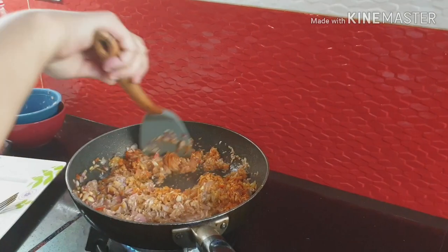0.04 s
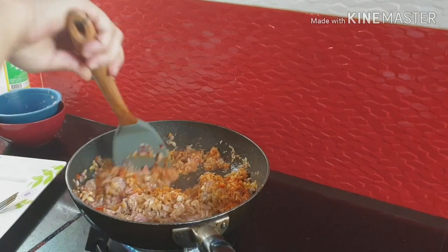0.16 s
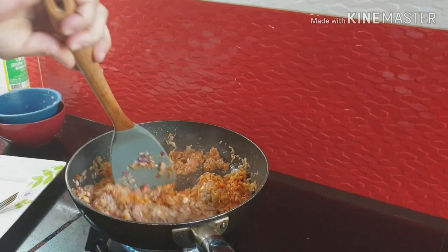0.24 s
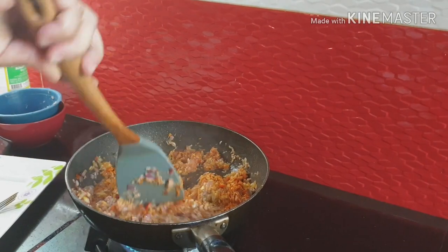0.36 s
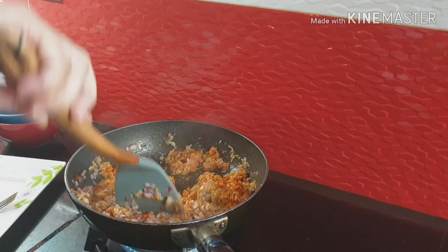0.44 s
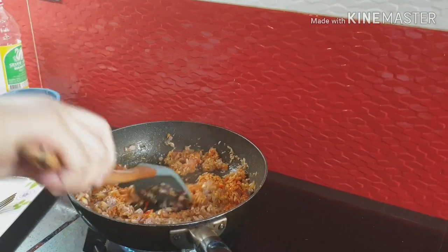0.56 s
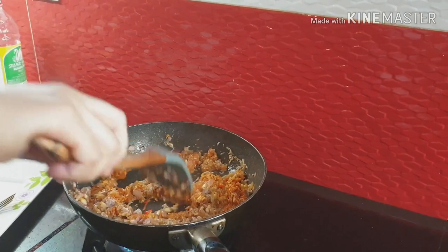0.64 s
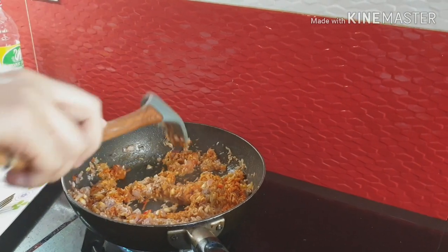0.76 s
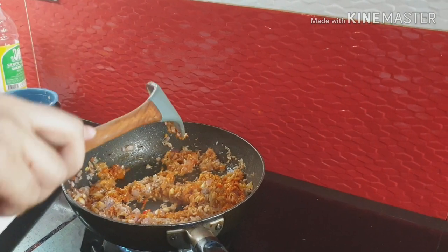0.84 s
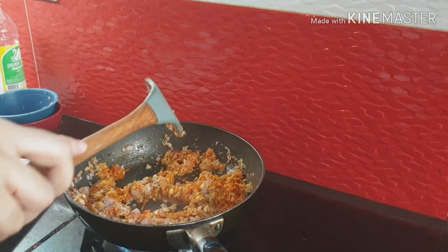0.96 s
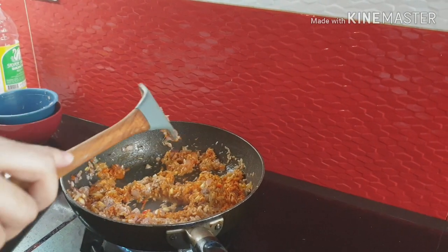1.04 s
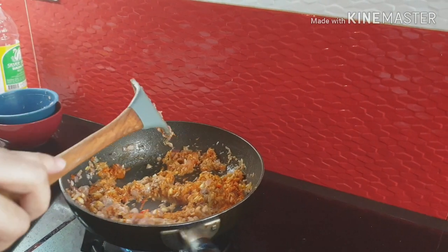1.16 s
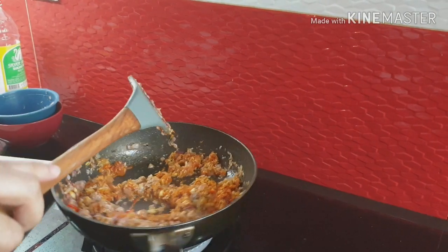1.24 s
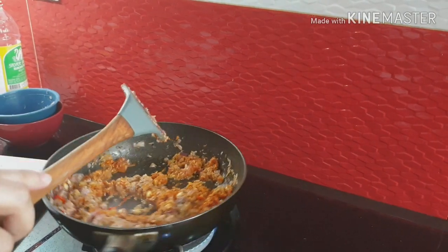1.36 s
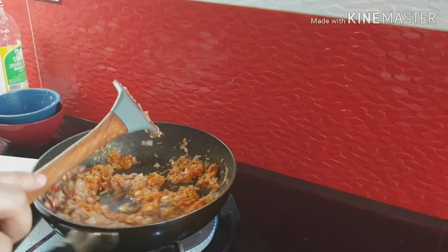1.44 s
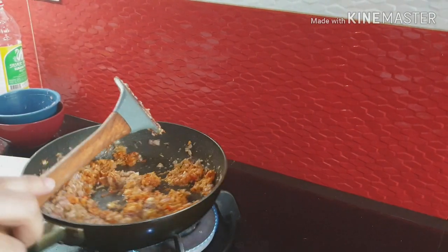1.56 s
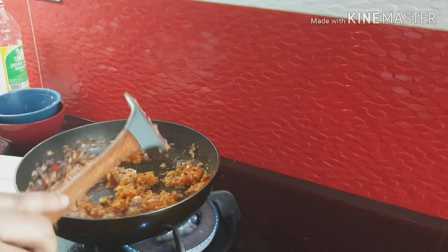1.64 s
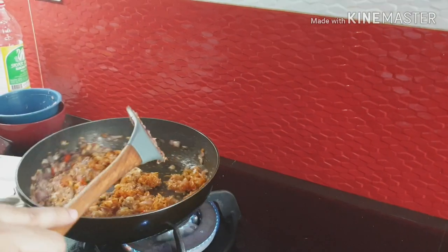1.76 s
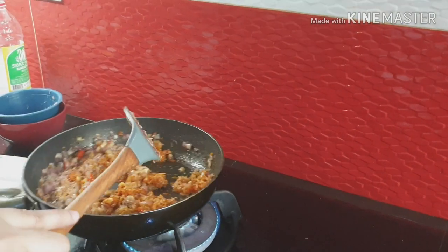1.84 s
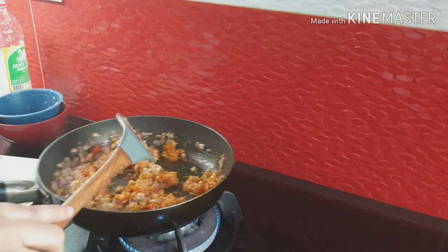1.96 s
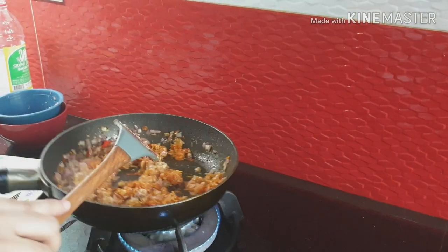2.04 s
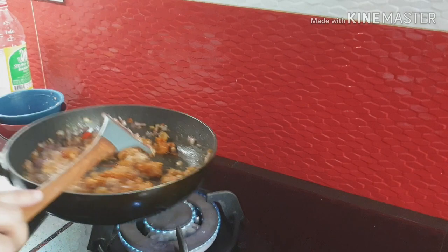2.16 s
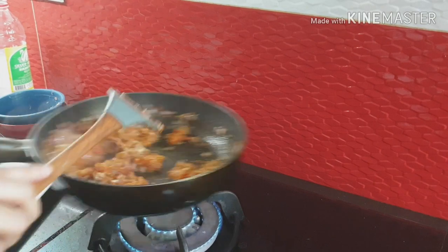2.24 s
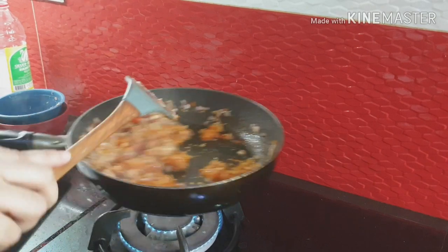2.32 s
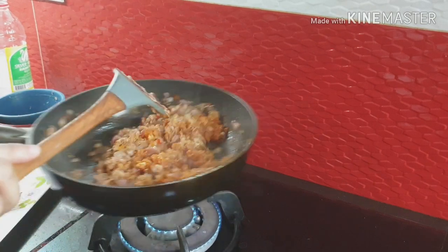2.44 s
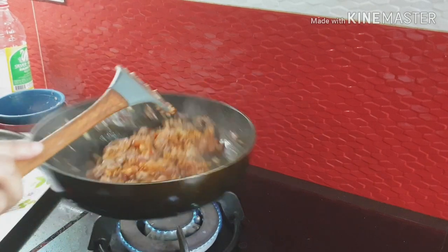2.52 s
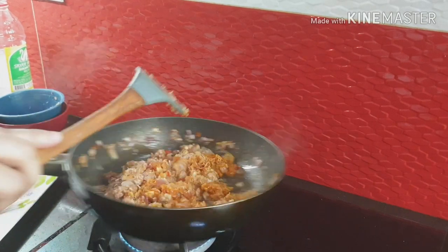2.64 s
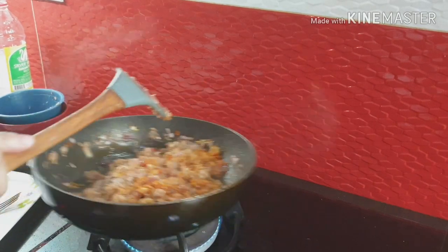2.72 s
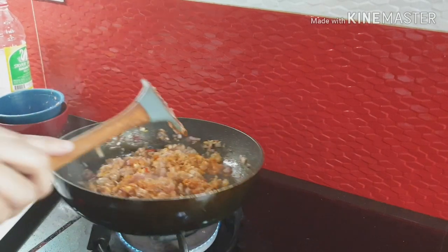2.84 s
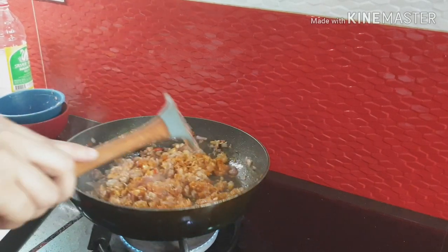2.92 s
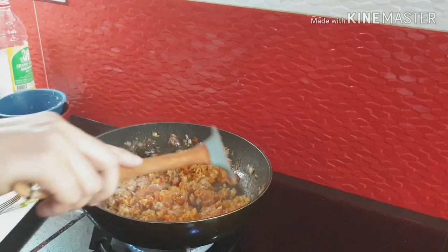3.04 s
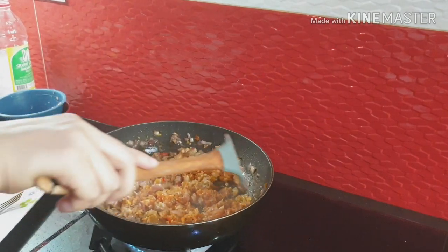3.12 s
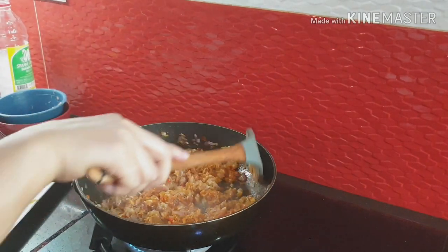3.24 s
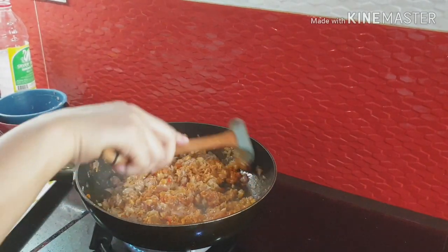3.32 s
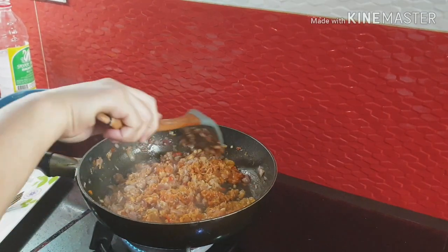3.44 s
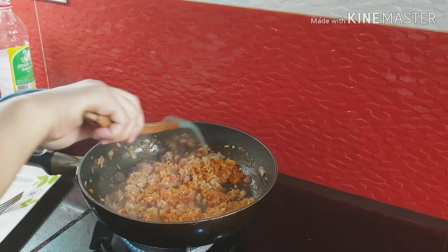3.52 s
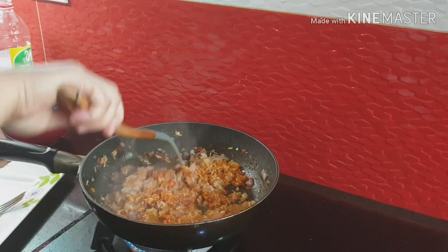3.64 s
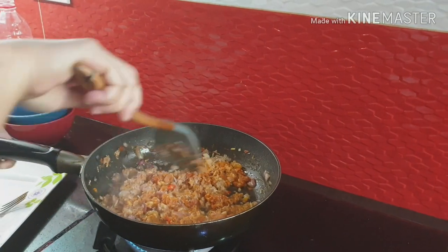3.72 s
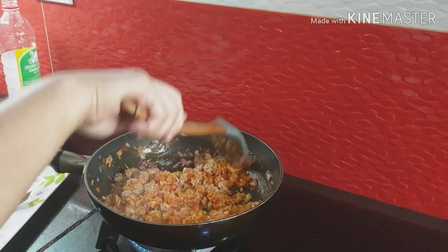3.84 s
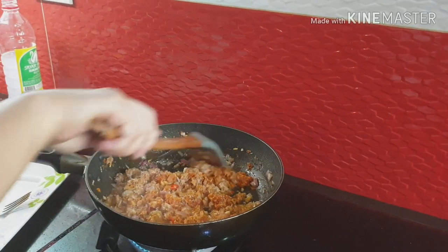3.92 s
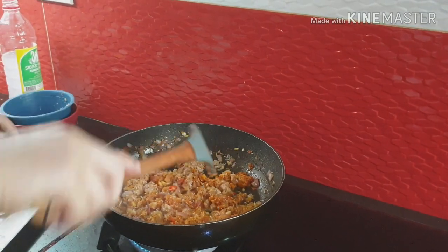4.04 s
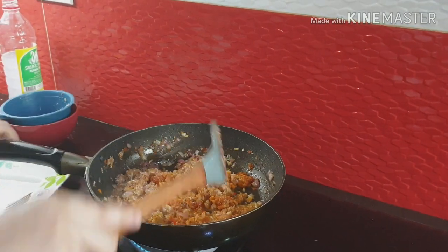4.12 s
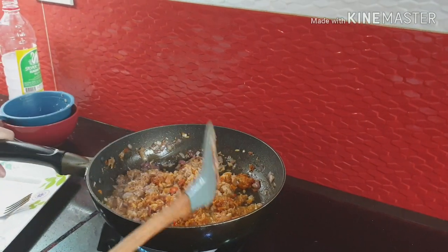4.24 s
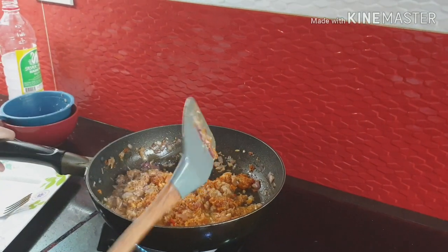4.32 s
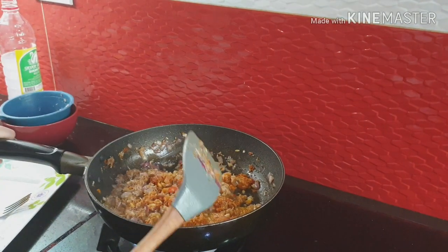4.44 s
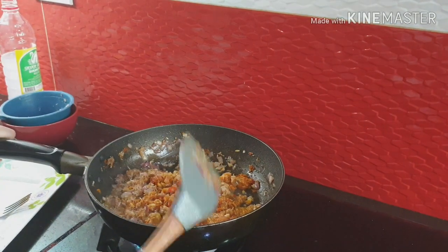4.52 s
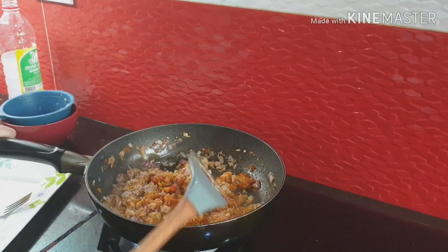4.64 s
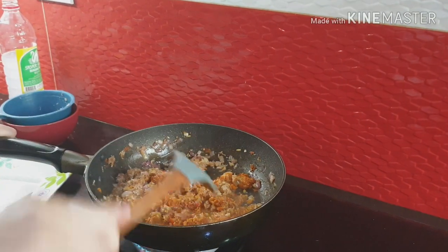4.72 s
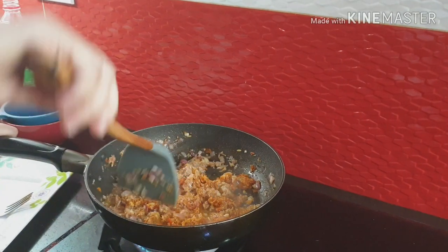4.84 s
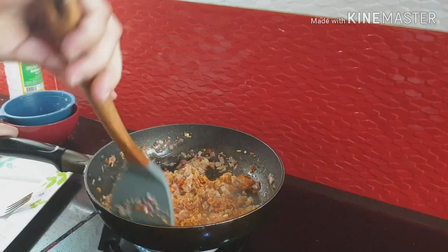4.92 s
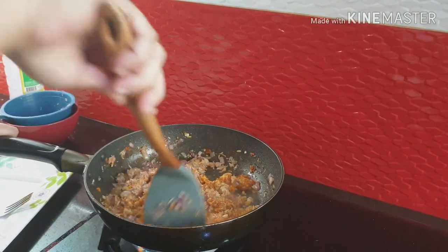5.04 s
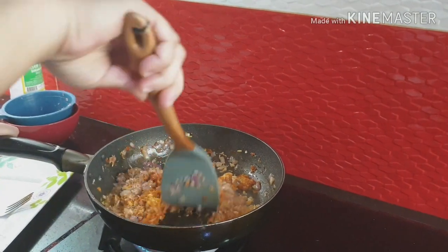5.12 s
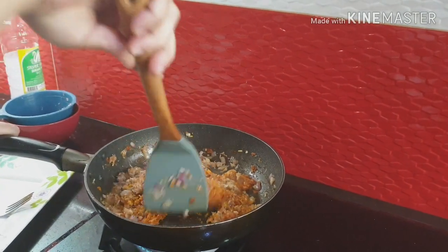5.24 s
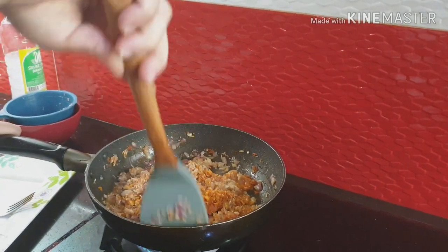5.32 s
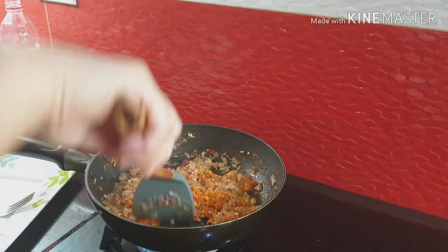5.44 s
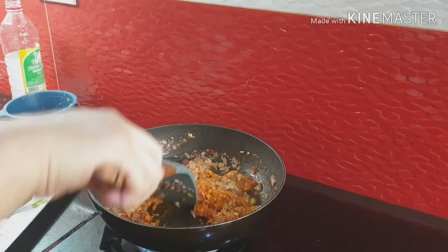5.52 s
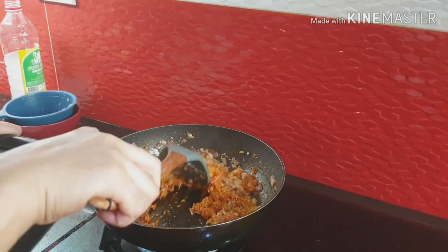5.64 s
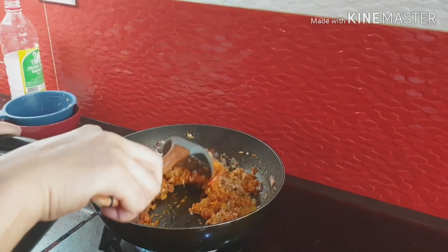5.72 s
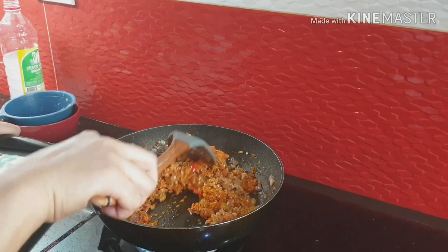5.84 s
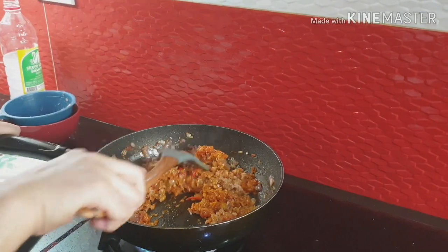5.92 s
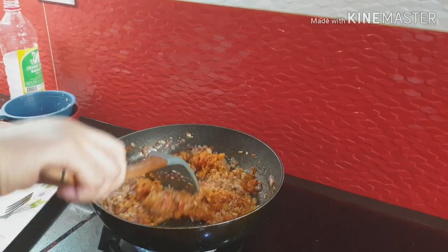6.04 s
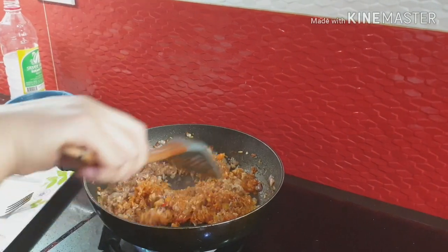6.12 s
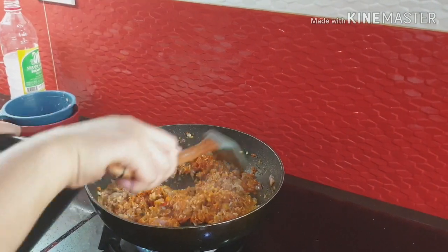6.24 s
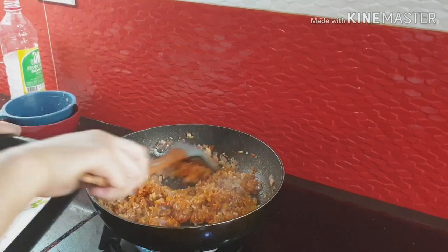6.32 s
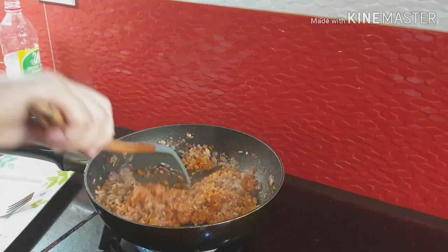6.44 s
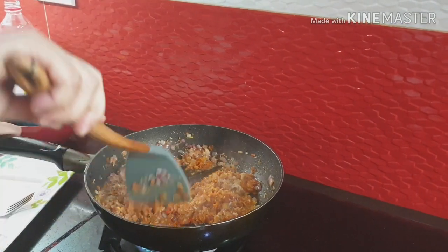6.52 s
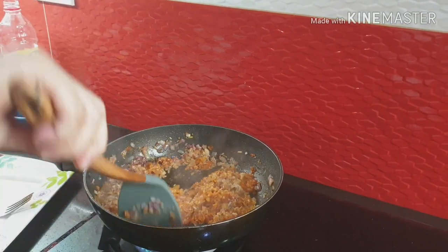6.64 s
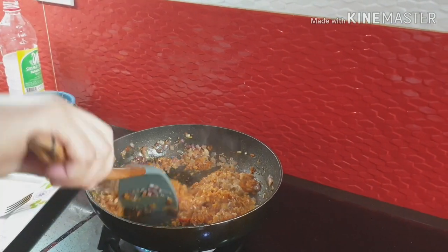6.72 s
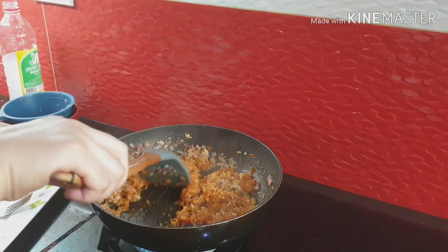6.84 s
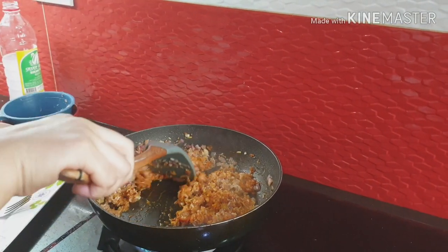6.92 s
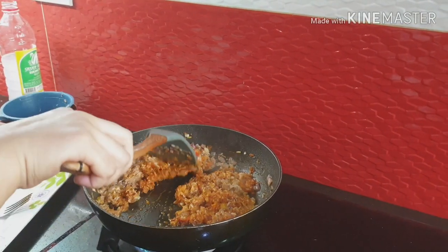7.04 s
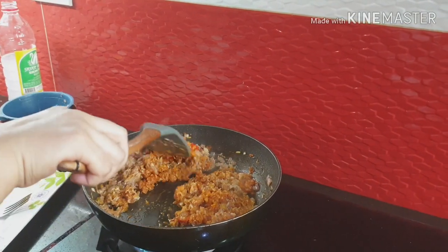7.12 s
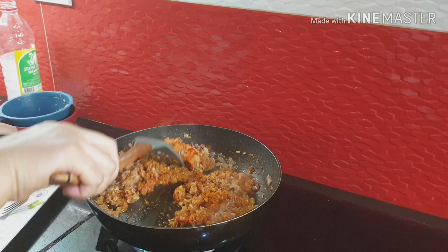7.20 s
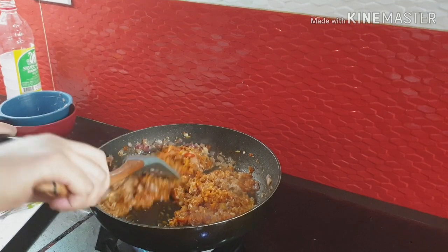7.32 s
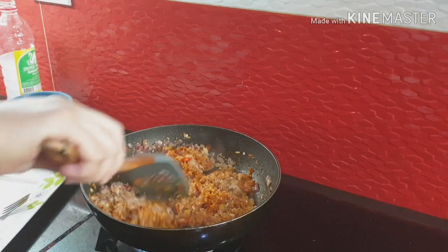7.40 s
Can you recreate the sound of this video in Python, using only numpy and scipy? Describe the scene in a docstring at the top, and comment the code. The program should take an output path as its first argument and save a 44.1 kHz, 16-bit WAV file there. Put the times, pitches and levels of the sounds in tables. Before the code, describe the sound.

A spatula taps a frying pan over faint sizzling, the pan scrapes and clatters across an iron grate, then clanks down and settles.

```python
"""A small kitchen, two microphone channels: the pan and gas stove on the right, only a faint hiss on the left.
Noise and tiny clicks make the flame and the sizzling paste throughout; a spatula taps the nonstick pan, then pushes.
The pan is dragged over the iron grate in shoves of stick-slip grains, amid knocks; tossed paste lands in steam.
It is set down with a clank, wobbles to rest and lands a few more times; one late tap and more soft pushes follow.
Each blow is a click that excites noisy bands, the ringing modes of the pan and the stove top."""
import sys
import numpy as np
from scipy import signal
from scipy.fft import rfft, irfft, next_fast_len
from scipy.io import wavfile

SR = 44100
rng = np.random.default_rng(int(sys.argv[2]) if len(sys.argv) > 2 else 0)


def digitize_waveform(pressure):
    """Quantize a signal to 16-bit integers and store it at the path in sys.argv[1].

    Rows of a 2-D input are taken as channels; values are limited to [-1, 1].
    """
    field = np.atleast_2d(pressure).T
    bounded = np.clip(field, -1, 1)
    quanta = np.round(bounded * 32767).astype(np.int16)
    wavfile.write(sys.argv[1], SR, quanta)


N = 329427
TIME = np.arange(N) / SR
# All source levels are in dB before the gains of the mix.


def from_db(db):
    """Decibels to gain."""
    return 10 ** (np.asarray(db) / 20)


def rms_one(x):
    """Scale to unit rms."""
    return x / np.sqrt(np.mean(x ** 2) + 1e-20)


def in_time(rows):
    """Each column of a curve at every sample."""
    s, *columns = np.transpose(rows)
    return [np.interp(TIME, s, c) for c in columns]


def at_hz(points, hz):
    """Read a table on a log-frequency axis."""
    f, value = np.transpose(points)
    return np.interp(np.log(hz), np.log(f), value)


def drift(rate):
    """Random wander of rms 1: `rate` new points a second, joined by straight lines."""
    points = rng.standard_normal(N // 20)
    return rms_one(np.interp(TIME * rate, np.arange(N // 20), points))


def high_pass(x, hz):
    """Remove what lies below a frequency."""
    return signal.sosfilt(signal.butter(2, hz, "high", fs=SR, output="sos"), x)


def colour(x, spectrum):
    """Give a steady signal a spectrum; rms 1."""
    size = next_fast_len(N)
    hz = np.maximum(np.arange(size // 2 + 1) * SR / size, 1)
    gain = from_db(at_hz(spectrum, hz)) * (hz > 20)
    return rms_one(irfft(rfft(x, size) * gain, size)[:N])


def clicks(times, sizes):
    """One impulse at each time."""
    out = np.zeros(N)
    out[np.round(times * SR).astype(int)] = sizes
    return out


def ring(x, hz, t60):
    """A damped resonance: a unit click sets a sine of height 1 ringing, down 60 dB after t60 seconds."""
    r, w = from_db(-60 / (t60 * SR)), 2 * np.pi * hz / SR
    return signal.lfilter([0, np.sin(w)], [1, -2 * r * np.cos(w), r * r], x + 1e-18)


def fade(power, t60):
    """Energy dies away by 60 dB in t60 seconds."""
    return signal.lfilter([1], [1, -10 ** (-6 / (t60 * SR))], power + 1e-24)


def grains(per_s, spread_db):
    """Random tiny clicks of uneven size; rms 1."""
    unevenness = np.minimum(rng.exponential(1, N), 4)
    sizes = from_db(spread_db * unevenness) * rng.standard_normal(N)
    return rms_one(sizes * (rng.random(N) < per_s / SR))


# Hard surfaces close to the pan, 0.6 to 2.5 m of extra path. Each row: delay in seconds, share reflected.
SURFACES = [(.0017,0.066),(.0029,0.18),(.0047,.35),(.0073,0.063)]


def reflect(x, above_hz):
    """Pan wall, stove top and backsplash throw back the short waves and comb the treble."""
    short = high_pass(x, above_hz)
    return x + sum(share * np.pad(short, (int(delay * SR), 0))[:N] for delay, share in SURFACES)


# Vigour of the frying, which flares with the toss and sinks until the stirring resumes.
# Each row: time in seconds, level of the sizzle in dB, level of the wet fizz in dB.
FRYING_VIGOUR = [(0,-54.5,-54),(1.8,-55.5,-51.5),(2.4,-54,-55),(3.5,-60,-58),(4.4,-59.5,-59),(6.1,-57.5,-58),(7.47,-53.5,-53)]
# Spectrum of the left channel's hiss. Each row: frequency in Hz, relative density in dB per Hz.
HISS_SPECTRUM = [(30, -6), (100, 0.5), (250, -4), (1000, 0), (2500, -5.5), (4500, -14), (6000, -21.5),
                 (8300, -33), (10500, -17), (13000, -16.5), (15500, -22)]


def left_hiss():
    """Faint noise in the left channel follows most of the sizzle's swing in dB."""
    sizzle_db, _ = in_time(FRYING_VIGOUR)
    level_db = -68.5 + 0.85 * (sizzle_db - sizzle_db.mean())
    return from_db(level_db) * colour(rng.standard_normal(N), HISS_SPECTRUM)


# Spectrum of the burner. Each row: frequency in Hz, relative density in dB per Hz.
FLAME_SPECTRUM = [(25, -13), (45, 1.5), (60, 3.5), (80, -3), (115, 0), (150, -10.5), (200, -14.5),
                  (270, -10), (340, -9.5), (430, -31), (1000, -36), (3000, -37)]


def flame():
    """The burner rumbles softly: low noise of slightly wandering level."""
    return from_db(-56 + 0.62 * drift(3.8)) * colour(rng.standard_normal(N), FLAME_SPECTRUM)


# Spectra of the tiny bubbles and the wet paste. Each row: frequency in Hz, relative density in dB per Hz.
SIZZLE_SPECTRUM = [(3000, -8), (6000, -3.5), (7800, -5.5), (9000, 1.5), (11400, 5.5), (13000, 0),
                   (15500, -10)]
FIZZ_SPECTRUM = [(80, -25), (200, -6.5), (500, 2.5), (800, 3.5), (1300, 1), (4800, 0), (7500, -6),
                 (15000, -10)]


def frying():
    """Countless tiny steam bubbles merge to a sizzle, over a lower fizz from the wet paste; a few pop alone."""
    sizzle_db, fizz_db = in_time(FRYING_VIGOUR)
    pops = .12 * grains(per_s=200, spread_db=2.5)
    bubbles = colour(rng.standard_normal(N) + pops, SIZZLE_SPECTRUM)
    wet_paste = colour(reflect(rng.standard_normal(N), above_hz=5400), FIZZ_SPECTRUM)
    sizzle = bubbles * from_db(sizzle_db + .5 * drift(25))
    fizz = wet_paste * from_db(fizz_db + 0.91 * drift(17))
    return sizzle + fizz


# Tossed paste lands on hot oil. Each row: time in seconds, level in dB.
SPLATS = [(2.5,-46),(2.535,-44),(2.562,-46),(2.585,-51)]


def splats():
    """Each lump that lands flashes a little water to steam: a short burst of treble noise."""
    s, level = np.transpose(SPLATS)
    flash = np.sqrt(fade(clicks(s, from_db(level)) ** 2, t60=.05))
    steam = [(3000, -18), (10000, -8), (14500, 0), (16000, -2), (18000, -30)]   # Hz, dB
    return flash * colour(rng.standard_normal(N), steam)


def strike(s, level_db, thud_db, clank_db, crack_db, clank_hz, ring_hz, lift_db, rock_db):
    """One contact: its time and level, its lows, mids and highs, the ring it favours, and how it rocks the stove."""
    return s, level_db, thud_db, clank_db, crack_db, clank_hz, ring_hz, lift_db, rock_db


def simple_blow(s, level, thud, hardness, ring_hz, lift_db, clank_hz, rock_db):
    """A simple contact: its hardness in dB is its crack, and a share of it adds to the clank."""
    clank = 5 + 0.54 * hardness
    return strike(s, level, thud, clank, hardness, clank_hz, ring_hz, lift_db, rock_db)


def contact_level(blow, hz, spot_share=1):
    """Level in dB at a frequency: weight gives lows, hardness highs, the spot touched favours some modes."""
    _, level, thud, clank, crack, clank_hz, favoured_hz, lift_db, _ = blow
    tilt = [(130, thud), (260, 0.0052), (900, 0), (2200, clank - 3), (5600, clank - 3), (8000, crack)]
    hump = 6 * np.exp(-(np.log2(hz / clank_hz) / 0.18) ** 2)
    spot = spot_share * lift_db * np.exp(-(np.log2(hz / favoured_hz) / 0.14) ** 2)
    return level + at_hz(tilt, hz) + hump + spot


# Dense clatter of pan and grate. Each row: frequency in Hz, relative density in dB per Hz.
CLATTER_SPECTRUM = [(35, -23), (60, 1), (130, -3), (165, 0), (205, -7.5), (280, 6.5), (360, -0.5),
                    (440, -4), (650, -2.5), (1050, -6.5), (2200, -11), (3300, -14.5), (4400, -14.5),
                    (7600, -21), (11200, -21), (15500, -35)]
# Reverberation of the small kitchen. Each row: frequency in Hz, t60 in seconds.
KITCHEN_DECAY = [(60, 0.75), (250, 0.48), (600, 0.53), (2500, 0.56), (5000, 0.42), (11000, 0.52),
                 (16000, 0.15)]
EDGES = np.geomspace(25, 16500, 29)   # band edges in Hz
CENTRES = np.sqrt(EDGES[1:] * EDGES[:-1])


def clatter(blows, body_t60, damping, room_db, snap):
    """A blow snaps, then excites a thicket of short modes (t60 given at 1 kHz), which lingers in the room."""
    s = np.array(blows)[:, 0]
    white, out = rng.standard_normal((2, N)), np.zeros(N)
    for k, hz in enumerate(CENTRES):
        level = np.array([contact_level(blow, hz, spot_share=0.38) for blow in blows])
        force = clicks(s, from_db(at_hz(CLATTER_SPECTRUM, hz) + level))
        body = fade(force ** 2, body_t60 * (hz / 1000) ** -damping)   # high modes die first
        room = fade((force * from_db(room_db)) ** 2, at_hz(KITCHEN_DECAY, hz))
        band = signal.butter(2, EDGES[k:k + 2], "band", fs=SR, output="sos")
        # neighbouring bands meet in opposite phase, so the snap alternates in sign
        snapping = (-1) ** k * snap * force
        lingering = white[k % 2] * np.sqrt(body + room)
        out += signal.sosfilt(band, snapping + lingering)
    return out


# Bending modes of the pan. Each row: frequency in Hz, level in dB, t60 in seconds when left undamped.
PAN_MODES = [(263,-3.5,0.13),(282,-38,0.068),(339,-7.5,0.4),(508,-10,0.25),(566,-8.5,0.36),(659,-10.5,0.36),(713,-10.5,0.22),(770,-14,0.42),(887,-12,0.14),(948,-21.5,.25),(1355,-19,0.43),(1790,-21,0.24),(1960,-45,0.12),(2040,-13.5,0.25),(2280,-26,0.61),(2934,-10.5,0.17),(4280,-15,0.091),(5130,-38,.25),(5200,-21,0.21),(9360,-19,0.16),(10700,-15,.12)]


def pan_ring(blows, sustain):
    """Every blow rings all pan modes, each with a strength of its own; whatever rests on the pan damps them."""
    s = np.array(blows)[:, 0]
    out = np.zeros(N)
    for k, (hz, mode_db, t60) in enumerate(PAN_MODES):
        level = np.array([contact_level(blow, hz) for blow in blows]) + rng.standard_normal(len(s))
        out += (-1) ** k * ring(clicks(s, from_db(level + mode_db)), hz, t60 * sustain)
    return out


def pan_sing(pushes):
    """The pan's modes under a steady stream of tiny pushes; rms 1."""
    modes = enumerate(PAN_MODES)
    return rms_one(sum((-1) ** k * from_db(db) * ring(pushes, hz, t60) for k, (hz, db, t60) in modes))


# Modes of the stove top. Each row: frequency in Hz, level in dB, t60 in seconds.
STOVE_MODES = [(102.3, -14, 0.57), (120.6, -4, 0.24)]


def stove_thud(blows):
    """A blow's weight passes through the grate, shakes the stove top and rocks the stove on its feet."""
    s, level, thud, *_, rocking = np.transpose(blows)
    force = clicks(s, from_db(level + thud))
    top = sum(from_db(mode_db) * ring(force, hz, t60) for hz, mode_db, t60 in STOVE_MODES)
    feet = ring(clicks(s, from_db(level + rocking)), hz=55.9, t60=0.39)
    return high_pass(top + feet, 42)


# High resonances of rim and grate under the scraping.
# Each row: frequency in Hz, bandwidth in Hz, relative level in dB.
RIM_BANDS = [(4400, 210, -3), (4940, 40, -2), (9180, 99, -5), (10700, 68, -5), (11500, 73, -3),
             (13500, 38, -7)]


def rim_sing(slips):
    """Narrow metallic bands that come and go as the point of contact travels; rms 1."""
    out = np.zeros(N)
    for hz, width, db in RIM_BANDS:
        t60 = np.log(1000) / (np.pi * width)
        out += from_db(db + 5.5 * drift(16.1)) * rms_one(ring(slips, hz, t60))
    return rms_one(out)


def shove(start, length, attack_s):
    """A shove builds up, slackens as the pan travels, and stops."""
    age = np.maximum(TIME - start, 0)
    sag_db = 24.5 * age   # rates in dB per second
    release_db = 258 * np.maximum(age - length, 0)
    return np.minimum(age / attack_s, 1) ** 2 * from_db(-sag_db - release_db)


# Shoves of the pan over the grate.
# Each row: start in seconds, length in seconds, level of the rasp in dB, level of the judder in dB.
SHOVES = [(1.175,0.24,-40,-36.5),(1.353,0.29,-37,-43),(1.798,0.29,-42,-53)]


def slide():
    """The base sticks and slips on the rough iron; the slips ring in the pan and make the stove judder."""
    rasping = sum(from_db(db) * shove(s, length, attack_s=0.071) for s, length, db, _ in SHOVES)
    juddering = sum(from_db(db) * shove(s, length, attack_s=0.021) for s, length, _, db in SHOVES)
    slips = grains(per_s=3000, spread_db=1.5) * from_db(2.0 * drift(110))
    rasp_spectrum = [(hz, db + 0.21 * np.log2(hz / 1000)) for hz, db in CLATTER_SPECTRUM]
    rasp = colour(reflect(slips, above_hz=1160), rasp_spectrum)
    judder = colour(slips, [(30, -20), (55, 14.0), (80, -15), (130, -2.5), (200, -14), (800, -75)])
    scrape = rasp + from_db(-7.0) * pan_sing(slips) + from_db(-9) * rim_sing(slips)
    return rasping * scrape + juddering * judder


# Spatula taps. Each row: time in seconds, level in dB, hardness in dB, favoured ring in Hz, its lift in dB.
TAPS = [(.109,-51.5,11,900,7),(0.285,-47,-15,340,1),(.511,-41.5,-12,340,3),(.561,-48,1,5200,14),(.644,-30.5,-9.5,530,10),(5.392,-54.5,6,331.3,24)]
# Soft pushes of the blade through the paste, one early and the others late.
# Each row: time in seconds, level in dB, stove rocking in dB.
PUSHES = [(.935,-63.5,13),(5.105,-61.5,19),(5.47,-62.5,20),(6.665,-58,2)]


def spatula_blows():
    """Light taps ring the pan; pushes are dull and heavy."""
    clank_hz = 4280
    taps = [simple_blow(s, level, -5.5, hardness, ring_hz, lift_db, clank_hz, rock_db=-9)
            for s, level, hardness, ring_hz, lift_db in TAPS]
    pushes = [simple_blow(s, level, thud=17, hardness=-9, ring_hz=320, lift_db=6, clank_hz=clank_hz,
                          rock_db=rock_db)
              for s, level, rock_db in PUSHES]
    return taps + pushes


def spatula():
    """The soft blade meets the pan through the paste, which shortens the pan's ring."""
    blows = spatula_blows()
    dense = reflect(clatter(blows, body_t60=.11, damping=0.36, room_db=-12.5, snap=3.6), above_hz=2100)
    ringing = from_db(-5) * pan_ring(blows, sustain=0.52)
    return from_db(16.5) * dense + ringing + from_db(3.5) * stove_thud(blows)


def landing(s, level, thud, hardness, ring_hz, rock_db, tip_s, tip_db, tip_clank_db, tip_hz):
    """The base comes down first; a moment later the pan tips onto a hard iron edge."""
    base = simple_blow(s, level, thud, hardness, ring_hz, lift_db=13, clank_hz=2100, rock_db=rock_db)
    tip = strike(s + tip_s, tip_db, thud_db=-0.5, clank_db=tip_clank_db, crack_db=5, clank_hz=4220,
                 ring_hz=tip_hz, lift_db=6, rock_db=rock_db + 4.5)
    return [base, tip]


# Touches of the pan as it wobbles to rest after the toss: times in seconds.
WOBBLES = [3.224, 3.283, 3.375]


def set_down():
    """A full clank, a sharp rebound and a dying wobble, ever weaker and softer."""
    clank_s, clank_level_db = 3.122, -17
    clank = strike(clank_s, clank_level_db, thud_db=-13.0, clank_db=0.8, crack_db=1.5, clank_hz=4630,
                   ring_hz=532, lift_db=7.5, rock_db=-6.5)
    rebound = strike(clank_s + .005, clank_level_db - 6.5, thud_db=-16, clank_db=0.0, crack_db=9.0,
                     clank_hz=1790, ring_hz=600, lift_db=1, rock_db=0.2)
    blows = [clank, rebound]
    for s in WOBBLES:
        age = s - WOBBLES[0]
        level, hardness = -32.5 - 72 * age, -7.5 - 55 * age   # losses in dB per second
        blows.append(simple_blow(s, level, thud=-2.5, hardness=hardness, ring_hz=337, lift_db=0.0,
                                 clank_hz=4370, rock_db=1.5))
    return blows


# Knocks of the pan on the grate, some in quick succession or just after a landing.
# Each row: time in seconds, level in dB, thud in dB, hardness in dB, favoured ring in Hz.
KNOCKS = [(1.21,-35.5,-4,-12,268),(1.243,-28,1,-8,272),(1.29,-38,6,-16,272),(1.374,-31,0,-2,784),(1.385,-38,1,-11,4300),(1.481,-27.5,-4.5,-4.5,750),(1.769,-42,-5,-14,766),(1.976,-36,1,-5.5,2000),(2.074,-26.5,-17,-21,682),(3.955,-37,-8,6,710),(4.314,-39.5,0.5,-12.5,293),(4.454,-26.5,2,2,640)]
# The pan lands on its base, then tips onto a second prong of the grate.
# Each row: time in seconds, level in dB, thud in dB, hardness in dB, favoured ring in Hz, stove rocking in dB,
# tipping time in seconds, second level in dB, second clank in dB, second ring in Hz.
LANDINGS = [(1.809,-26.5,-2,1.5,284,-4.5,0.018,-36,13.5,756),(2.012,-22.5,-20,-3.5,715,-17,0.0053,-27,7,550),(3.942,-32,-2,-0.5,281,-8.5,0.02,-29.5,4.5,260),(4.442,-23.5,-27,-35,269,-4,0.0043,-25,8.5,280),(4.602,-28.5,4,-21,265,-3.5,.004,-34,13,587)]


def pan_blows():
    """Every blow of pan on grate: knocks, landings and the setting down."""
    grate_knocks = [simple_blow(*row, lift_db=6.5, clank_hz=4160, rock_db=-6) for row in KNOCKS]
    landings = [touch for row in LANDINGS for touch in landing(*row)]
    return grate_knocks + landings + set_down()


def knocks():
    """The pan's base strikes the iron grate: dense clatter, ringing pan and thudding stove."""
    blows = pan_blows()
    dense = reflect(clatter(blows, body_t60=0.088, damping=0.047, room_db=-13, snap=3.6), above_hz=1360)
    ringing = from_db(-4) * pan_ring(blows, sustain=0.82)
    return from_db(17) * dense + ringing + from_db(0.5) * stove_thud(blows)


def scene():
    """Faint hiss on the left, the kitchen on the right."""
    kitchen = flame() + frying() + splats() + slide() + spatula() + knocks()
    return np.array([left_hiss(), from_db(5.5) * kitchen])


def record(dry):
    """Both microphone channels: the loudest peaks are rounded and the top is cut above 15550 Hz."""
    rounded = np.tanh(dry)
    return signal.sosfilt(signal.ellip(12, .1, 90, 15550, fs=SR, output="sos"), rounded)


dry = scene()
out = record(dry)
digitize_waveform(out)
```